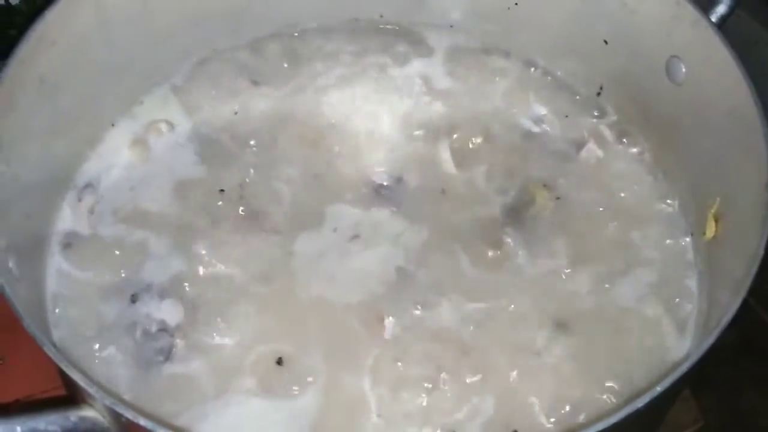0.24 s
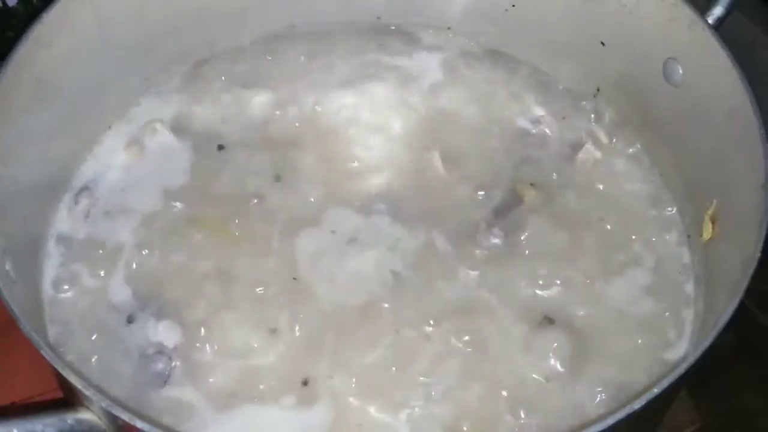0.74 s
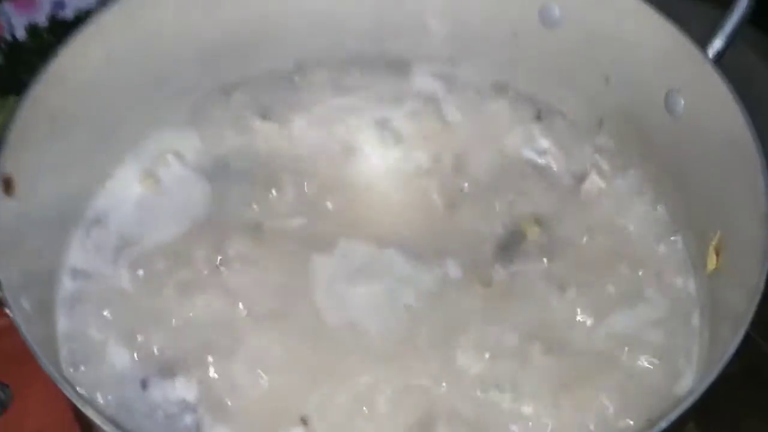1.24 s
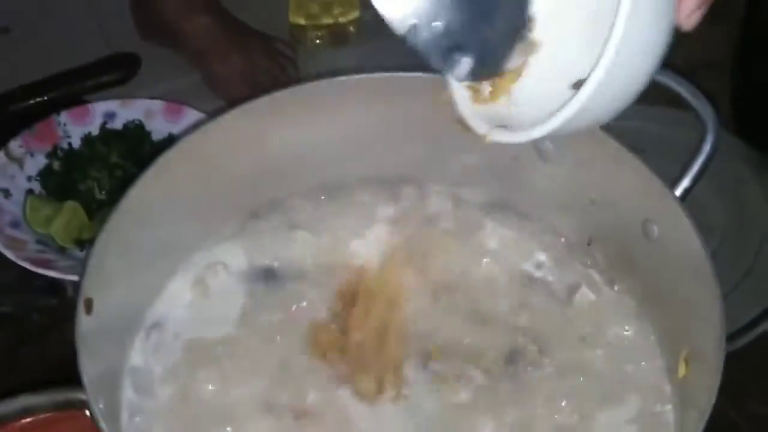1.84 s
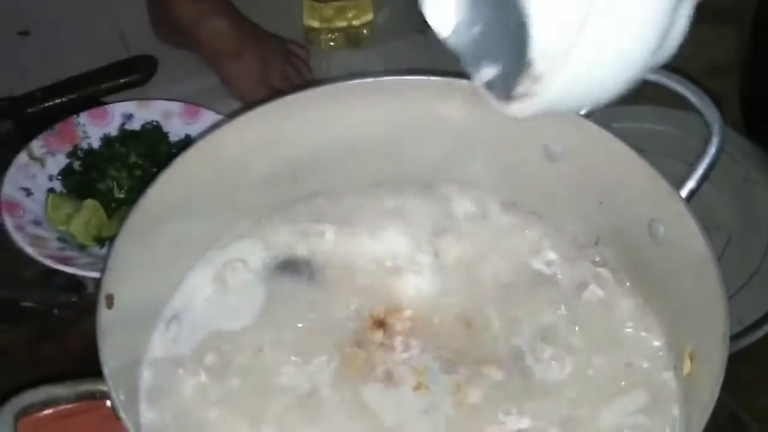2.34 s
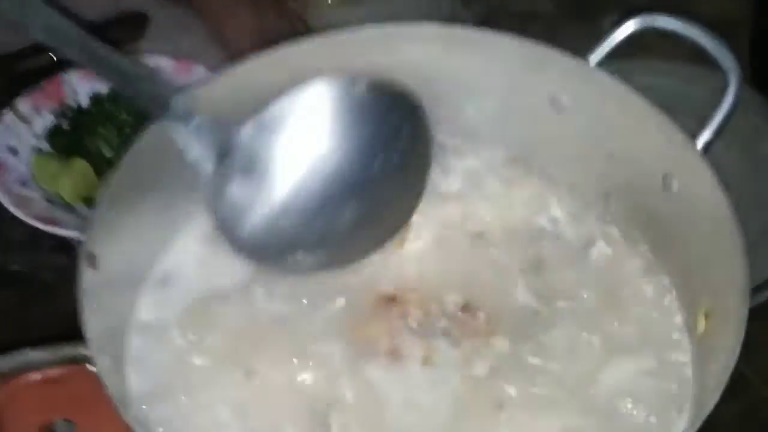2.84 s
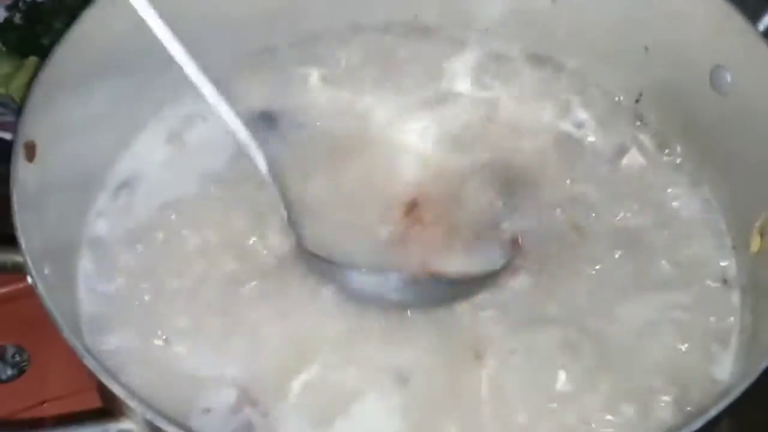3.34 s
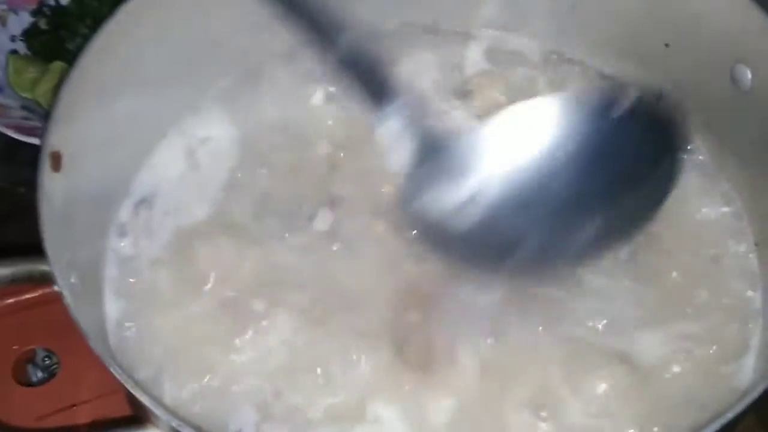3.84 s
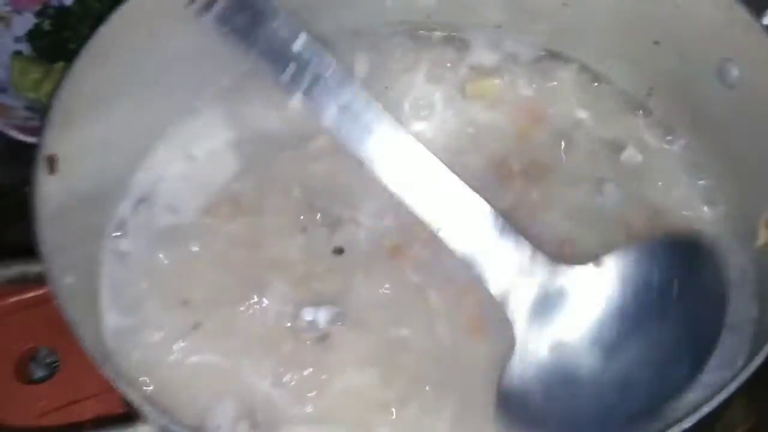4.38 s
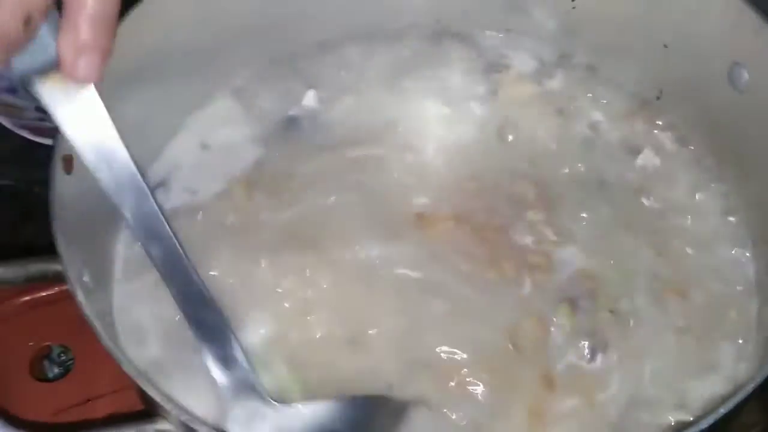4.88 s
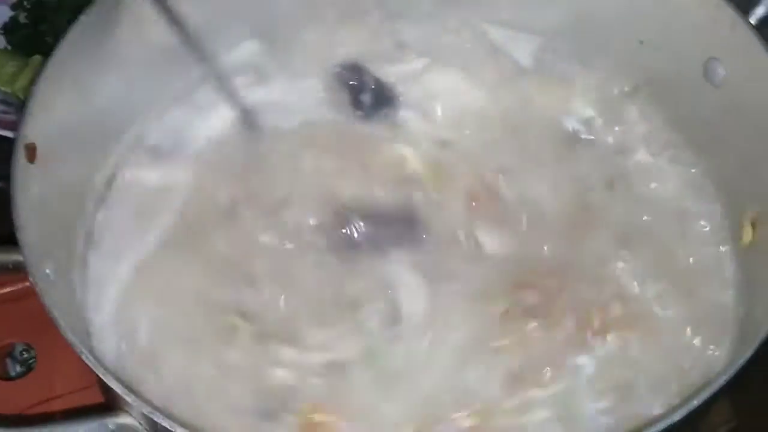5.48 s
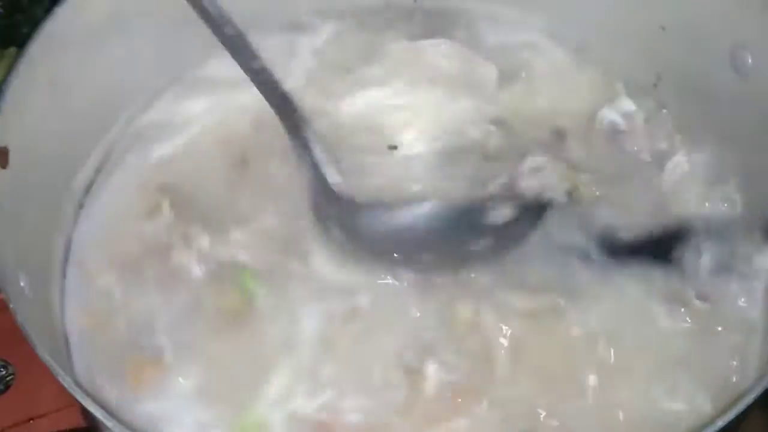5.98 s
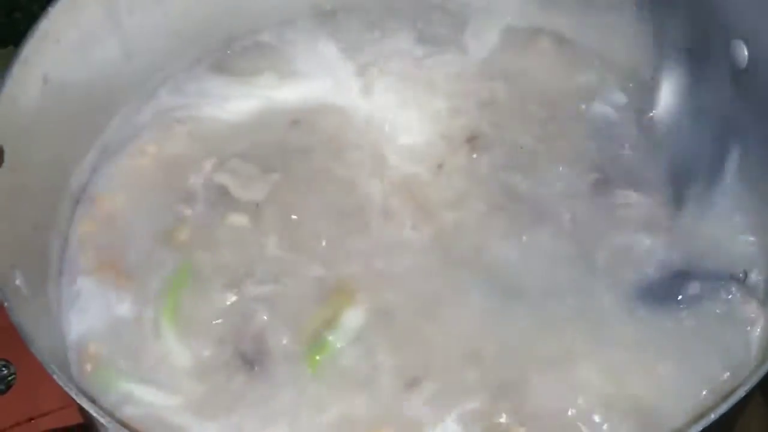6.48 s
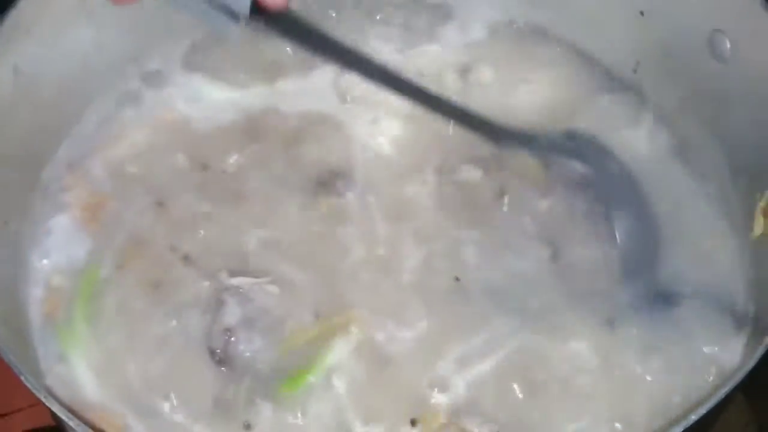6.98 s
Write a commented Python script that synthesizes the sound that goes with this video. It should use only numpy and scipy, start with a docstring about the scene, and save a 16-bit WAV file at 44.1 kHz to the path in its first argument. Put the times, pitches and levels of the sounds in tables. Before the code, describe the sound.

Thick porridge plops, spits and sizzles in a metal pot in a small kitchen. A spoon clinks on a china bowl, seasoning patters in, and several sharper taps knock out the rest. A ladle then stirs with wet crackles and dull knocks, striking the pot hard once near the end. The close hand-held microphone hears it mainly on the right, while the left is muffled with handling rumble.

```python
"""Thick porridge sizzles, plops and spits in a metal pot in a small kitchen, close to a hand-held camera.
From 1.4 s a spoon clinks on a china bowl, seasoning slides in, and the spoon knocks out the rest.
From 3.4 s a ladle stirs, crackling wetly, and knocks on the pot, which shifts; at 6.5 s it strikes hard.
Throughout, the right microphone hears the scene; the left is muffled and carries mostly grip rumble."""
import sys
import numpy as np
from scipy import signal
from scipy.fft import rfft, irfft, next_fast_len
from scipy.io import wavfile
from scipy.ndimage import uniform_filter1d

SR = 44100
rng = np.random.default_rng(int(sys.argv[2]) if len(sys.argv) > 2 else 0)


def generate_wav(signal):
    """Clip the signal to [-1, 1] and save it as 16-bit WAV at the path in sys.argv[1]."""
    frames = np.transpose(np.atleast_2d(signal))
    scaled = np.clip(frames, -1, 1) * 32767
    pcm = np.round(scaled).astype(np.int16)
    wavfile.write(sys.argv[1], SR, pcm)


N = 318402


def amp(db):
    return 10 ** (np.asarray(db) / 20)


def unit_rms(x):
    return x / np.sqrt(np.mean(x ** 2) + 1e-20)


def at_hz(points, hz):
    """Interpolates (f, value) rows over log frequency."""
    f, value = np.transpose(points)
    return np.interp(np.log(hz + 1), np.log(f), value)


def add(mix, start_s, sound):
    part = mix[max(round(start_s * SR), 0):][:len(sound)]
    part += sound[:len(part)]


def clock(length_s):
    return np.arange(int(length_s * SR)) / SR


def fade(t, t60_s):
    return amp(-60 * t / max(t60_s, .003))


def swells(rows, attack_s, t60_s):
    """Gain that rises, holds and decays for each (start, end, level) row."""
    t = np.arange(N) / SR
    return sum(amp(db) * np.clip((t - start) / attack_s, 0, 1) ** 2 * fade(np.maximum(t - end, 0), t60_s)
               for start, end, db in rows)


def shaped(x, gain):
    """Filters x by gain(hz)."""
    size = next_fast_len(len(x))
    return irfft(rfft(x, size) * gain(np.fft.rfftfreq(size, 1 / SR) + 1), size)[:len(x)]


def curve(colour):
    return lambda hz: amp(at_hz(colour, hz))


def band(centre_hz, width_oct):
    return lambda hz: np.exp(-(np.log2(hz / centre_hz) / (2 * max(width_oct, .05))) ** 2)


def high_pass(x, edge_hz):
    return signal.sosfilt(signal.butter(4, edge_hz, "high", fs=SR, output="sos"), x)


def noise(colour):
    return unit_rms(shaped(rng.standard_normal(N), curve(colour)))


def rippled(x, depth_db, spacing_hz=130):
    """Echoes between the pot's walls cut peaks and notches that differ from spot to spot."""
    grid_hz = np.arange(1, SR / 2, 50)
    kernel = np.exp(-((grid_hz[:41] - grid_hz[20]) / spacing_hz) ** 2)
    ripple = unit_rms(signal.fftconvolve(rng.standard_normal(len(grid_hz)), kernel, "same"))
    return shaped(x, lambda hz: amp(depth_db * np.interp(hz, grid_hz, np.minimum(ripple, 1))))


def puff(tint, t60_s, ripple_db, spacing_hz=130):
    """Decaying noise burst filtered by tint(hz); initial rms 1, 2 ms of lead."""
    decay = fade(clock(.25), t60_s)
    burst = np.pad(rng.standard_normal(len(decay)) * decay, (len(clock(.002)), 0))
    burst = rippled(shaped(burst, tint), ripple_db, spacing_hz)
    return burst * np.linalg.norm(decay) / np.linalg.norm(burst)


def bubble(hz, cycles, glide=.06, softness=.6):
    """The skin opens and the cavity sings a few cycles, rising by glide; 10 ms of lead."""
    cycles = max(cycles, 1)
    turns = (clock(.04) - .01) * hz
    steepness = np.where(turns < 0, 2 / softness, 2)
    envelope = 1 / np.cosh(np.clip(turns / cycles * steepness, -40, 40))
    bend = glide * np.log(np.cosh(turns / cycles)) * cycles
    return envelope * np.sin(2 * np.pi * (turns + bend))


def crackle(colour, per_s, spread_db, patchy_db):
    """Dense tiny pops whose colour shifts as they wander round the pot."""
    sizes = amp(spread_db * np.minimum(rng.exponential(1, N), 4)) * rng.choice([-1, 1], N)
    spectra = signal.stft(sizes * (rng.random(N) < per_s / SR), nperseg=512)[2]
    patches = uniform_filter1d(rng.standard_normal(spectra.shape), size=3, axis=0)
    patches = unit_rms(uniform_filter1d(patches, size=24, axis=1))
    pops = signal.istft(spectra * amp(patchy_db * np.minimum(patches, 1.5)), nperseg=512)[1][:N]
    return unit_rms(shaped(pops, curve(colour)))


# room air: f/Hz, level/dB
AIR_COLOUR = [(20, 10), (80, 11), (160, -15), (350, -9), (900, -22), (1500, -8), (2600, -35), (4200, -21.5),
              (6500, -32.5), (12000, -27.5), (14000, -16)]


def background(left_db=-80, right_db=-66, whine_db=-67, whine_hz=1683, width_hz=12):
    """Left: faint hiss. Right: quiet kitchen air and a thin steady whine."""
    whine = shaped(rng.standard_normal(N), lambda hz: 1 / (1 + ((hz - whine_hz) / width_hz) ** 2))
    left = amp(left_db) * noise([(100, 10), (600, -10), (3000, -11), (14000, -18)])
    right = amp(right_db) * noise(AIR_COLOUR) + amp(whine_db) * unit_rms(whine)
    return np.array([left, right])


# grip rumble: t/s, level/dB
GRIP_LEVEL = [(0, -43), (.46, -43), (.72, -52.5), (1.04, -66), (1.12, -30), (1.21, -43), (1.3, -38),
              (1.39, -23.5), (1.55, -37), (1.64, -28.5), (1.71, -31.5), (1.86, -26.5), (2.02, -45.5),
              (2.2, -49), (2.7, -42.5), (2.97, -28.5), (3.12, -43.5), (3.28, -34), (3.72, -57), (3.82, -49),
              (4.0, -48), (4.23, -54), (4.39, -35), (4.68, -59.5), (5.35, -60), (5.55, -52), (5.8, -67.5),
              (6.2, -71), (6.62, -45), (6.84, -52.5), (7.07, -46), (7.21, -63.5)]
# grip spectrum: f/Hz, level/dB
GRIP_COLOUR = [(20, -33.5), (38, -16.5), (52, 0.5), (78, 4.5), (110, -7), (160, -15.5), (250, -27.5),
               (500, -40.5), (900, -53.5), (4000, -78)]
# finger bumps: t/s, level/dB, f/Hz, t60/s, click level/dB
FINGER_BUMPS = [(0.038, -29, 61, 0.18, -60), (1.096, -27.5, 75.5, 0.14, -60), (1.248, -19, 59, 0.32, -27.5),
                (1.324, -10, 73, 0.16, -39), (1.552, -47, 90.5, .05, -32), (2.443, -18.5, 65.4, 0.15, -73),
                (3.268, -31, 65, 0.059, -34.5), (3.926, -29.5, 61, 0.39, -68), (4.385, -45, 71, .08, -29.5),
                (5.445, -33, 69.5, 0.048, -24.5), (5.453, -28.5, 61, 0.38, -19)]


def handling(gain_db=-1, click_t60_s=.0052, click_hz=900, low_cut_hz=36):
    """The grip rumbles through the camera case; fingers bump it now and then."""
    rumble = signal.hilbert(noise(GRIP_COLOUR))
    steady = rumble.real / np.sqrt(uniform_filter1d(abs(rumble) ** 2, size=1500) / 2 + .08)
    grip_db = np.interp(np.arange(N) / SR, *np.transpose(GRIP_LEVEL))
    out, t = amp(gain_db + grip_db) * steady, clock(.3)
    for s, db, hz, t60_s, click_db in FINGER_BUMPS:
        add(out, s, amp(db) * np.sin(2 * np.pi * hz * t) * fade(t, t60_s) * np.minimum(t / .00222, 1))
        click = puff(lambda f: 1 / (1 + (f / click_hz) ** 2), click_t60_s, ripple_db=1)
        add(out, s - .002, amp(click_db) * click)
    return shaped(out, lambda hz: 1 / (1 + (low_cut_hz / hz) ** 8))


# bursts of fine crackle: start/s, end/s, level/dB
CRACKLE_BURSTS = [(-.04, .03, -51.5), (.41, .67, -43), (1.01, 1.1, -39), (1.15, 1.66, -55),
                  (3.36, 3.48, -74), (4.27, 4.38, -59.5), (4.75, 5.02, -56), (5.82, 5.87, -72.5),
                  (6.6, 6.77, -55), (7.05, 7.15, -67.5)]
# fine crackle spectrum: f/Hz, level/dB
CRACKLE_COLOUR = [(900, -27), (2100, -15.5), (2800, 4.5), (4500, 8), (7200, 7.5), (9000, 0.5), (11500, 2),
                  (14000, -4)]


def fine_crackle(gain_db=-1, simmer_db=-80):
    """Bursts over a faint simmer: porridge sizzles at first, later crackles wetly under the ladle."""
    envelope = amp(simmer_db) + swells(CRACKLE_BURSTS, attack_s=.022, t60_s=.35)
    return amp(gain_db) * envelope * crackle(CRACKLE_COLOUR, per_s=2400, spread_db=3.5, patchy_db=8)


# porridge heaves: start/s, end/s, level/dB
CHURN_HEAVES = [(.5, .72, -53.5), (1.04, 1.11, -43.5), (1.47, 1.57, -48), (1.85, 2.1, -56), (2.8, 3.1, -66),
                (3.15, 3.3, -63.5), (3.38, 3.46, -71), (4.28, 4.45, -51.5), (4.76, 4.94, -48.5),
                (6.24, 6.7, -53), (7.02, 7.12, -47)]
# churning spectrum: f/Hz, level/dB
CHURN_COLOUR = [(200, -28), (380, 6.5), (520, 7.5), (750, -18.5), (1100, 13), (1500, -2.5), (2400, 6.5),
                (3500, -28), (6000, -27.5)]


def churn(bubbles_db=-4, squelch_db=-7, rest_db=-83.5, low_hz=360, high_hz=2250, spread_db=6.5):
    """Porridge bubbles and squelches softly, heaving with the boil or the push of the ladle."""
    swarm = np.zeros(N)
    for when, pitch, size in rng.random((1400, 3)):
        hz = low_hz * (high_hz / low_hz) ** pitch
        db = at_hz(CHURN_COLOUR, hz) - spread_db * np.log(.097 + size)
        add(swarm, when * N / SR, hz * amp(db) * bubble(hz, cycles=9, glide=0))
    squelch = crackle(CHURN_COLOUR, per_s=1800, spread_db=1.5, patchy_db=13)
    motion = amp(rest_db) + swells(CHURN_HEAVES, attack_s=.049, t60_s=.19)
    return motion * (amp(bubbles_db) * unit_rms(swarm) + amp(squelch_db) * squelch)


# gritty rasps: start/s, end/s, level/dB, f/Hz, width/oct
GRITTY_RASPS = [(0, 0.05, -56, 1980, 0.65), (3.681, 3.726, -61, 1670, 0.2),
                (4.27, 4.472, -51.5, 2560, 0.54), (4.7, 4.777, -57, 3660, 0.24),
                (6.283, 6.467, -52, 890, 0.056), (7.033, 7.198, -76, 1810, 0.48)]


def rasps(slips_per_s=700):
    """Short gritty rasps in the porridge; the later ones are rice grains slipping as the ladle moves."""
    out, t = np.zeros(N), clock(.19)
    for start, end, db, hz, width_oct in GRITTY_RASPS:
        slips = rng.standard_normal(len(t)) * (rng.random(len(t)) < slips_per_s / SR)
        rasp = unit_rms(rippled(shaped(slips, band(hz, width_oct)), depth_db=5))
        progress = np.clip(t / (end - start), 0, 1)
        add(out, start, amp(db) * np.sqrt(abs(np.sin(np.pi * progress))) * rasp)
    return out


def ticks(base_db=-58, spread_db=5, low_hz=2600, high_hz=10000, width_oct=.093, count=260):
    """Pinhead bubbles burst with dry ticks throughout."""
    out, t = np.zeros(N), clock(.02)
    for when, pitch, size in rng.random((count, 3)):
        snap = np.roll(rng.standard_normal(len(t)) * fade(t, t60_s=.012), len(t) // 4)
        hz = low_hz * (high_hz / low_hz) ** pitch
        db = base_db - spread_db * np.log(.04 + size)
        add(out, when * N / SR, amp(db) * shaped(snap, band(hz, width_oct)))
    return out


def blips(top_db=-50, spread_db=10, low_hz=520, high_hz=1400, count=34):
    """Smaller bubbles burst, one at a random moment in each time slot."""
    out = np.zeros(N)
    for slot, (when, pitch, size) in enumerate(rng.random((count, 3))):
        hz = low_hz * (high_hz / low_hz) ** pitch
        add(out, (slot + when) / count * N / SR, amp(top_db - spread_db * size) * bubble(hz, cycles=1))
    return out


def chirr(level_db=-65, centre_hz=13560, width_hz=110, first_s=.115, period_s=.36):
    """A faint, very high repeating chirp, perhaps a cricket."""
    attack_s, hold_s = .015, .06
    t = (np.arange(N) / SR - first_s) % period_s
    envelope = np.minimum(t / attack_s, 1) * fade(np.maximum(t - hold_s, 0), t60_s=.3)
    trill = shaped(rng.standard_normal(N), lambda hz: np.exp(-((hz - centre_hz) / width_hz) ** 2))
    return amp(level_db) * envelope * unit_rms(trill)


# large bubbles: t/s, level/dB, f/Hz, base length/cycles
LARGE_BUBBLES = [(0.315, -34, 1100, 2.1), (0.4003, -35.5, 594, 1.7), (0.6857, -32.5, 765, 0.9),
                 (0.8589, -40, 454, 0.5), (0.8713, -38, 1030, 0.92), (1.0305, -45.5, 1110, 5.8),
                 (1.0854, -28, 1620, 1), (1.1454, -18, 950, 0.8), (1.179, -31, 516, 1.9),
                 (1.2242, -27.5, 1220, 0.9), (1.2472, -32, 1070, 0.7), (1.4623, -27, 1210, 0.7),
                 (1.5257, -30.5, 970, 0.6), (1.8935, -33, 498, 1.9), (1.9342, -33, 507, 1.9),
                 (2.0214, -19, 600, 0.6), (2.0816, -25, 946, 1.1), (2.7707, -24, 1340, 1.7),
                 (2.7919, -31.5, 520, 1.4), (2.9212, -34, 1364, 3.4), (2.9505, -26, 1585, 0.82),
                 (2.991, -18, 970, 0.82), (3.1905, -38.5, 1120, 4.8), (3.211, -31.5, 496, 1.4),
                 (3.2219, -22, 796, 0.64), (3.427, -25.5, 1110, 0.88), (3.5732, -47.5, 631, 5),
                 (3.8074, -39.5, 1024, 2.7), (3.871, -35, 645, 1.24), (4.1385, -21, 904, 1.23),
                 (4.3503, -37.5, 960, 2.9), (4.4326, -26, 740, 0.5), (4.4376, -27, 1120, 3.8),
                 (4.516, -19, 720, 0.6), (4.6822, -41, 1080, 3.9), (4.9807, -30.5, 745, 0.65),
                 (5.2043, -39, 466, 2.4), (5.5872, -28.5, 516, 1.6), (5.853, -38, 1132, 3.8),
                 (6.0466, -33, 980, 0.86), (6.699, -26.5, 652, 0.85), (7.0564, -31, 590, 0.5),
                 (7.0742, -23.5, 940, 2.04)]


def plops(low_cut_hz=320, tear_db=-27, after_db=-20, after_s=.025):
    """A large bubble tears its wet skin; smaller ones follow as the crater closes."""
    out = np.zeros(N)
    for s, db, hz, cycles in LARGE_BUBBLES:
        add(out, s - .01, amp(db) * bubble(hz, cycles + .2, softness=.8))
        tear = puff(band(hz * .81, width_oct=.4), t60_s=.038, ripple_db=4)
        add(out, s - .004, amp(db + tear_db) * tear)
        for delay, pitch in rng.random((4, 2)):
            follower = bubble(hz * (.45 + .9 * pitch), cycles=1.5)
            add(out, s + after_s * delay - .005, amp(db + after_db) * follower)
    return shaped(out, lambda hz: 1 / (1 + (low_cut_hz / hz) ** 6))


# wet snaps: t/s, level/dB, f/Hz, width/oct
FILM_SNAPS = [(0.3461, -45, 5330, .35), (0.4183, -22.5, 5560, 0.46), (0.7504, -37, 10000, 0.54),
              (0.9102, -26, 6750, 0.81), (1.0429, -21.5, 7640, 0.34), (1.085, -24, 8100, 0.51),
              (1.827, -31, 6600, 0.6), (1.847, -37, 4850, 0.43), (1.9455, -22, 5650, 0.37),
              (2.5988, -42, 6540, 0.5), (2.802, -38, 5850, 0.28), (3.18, -46, 5700, 0.19),
              (3.215, -48, 7040, 0.67), (3.311, -53, 3820, 0.85), (3.389, -45, 6370, 0.11),
              (3.548, -40, 4190, .1), (3.591, -48.5, 2600, 0.13), (3.762, -48, 6500, .5),
              (3.807, -44, 5320, 0.31), (3.95, -45.5, 5500, 0.33), (4.0869, -38, 5000, .5),
              (4.1953, -37.5, 4600, 0.25), (4.511, -35.5, 4540, 0.24), (4.709, -40, 6280, 0.49),
              (4.8167, -32.5, 3750, 0.79), (4.8383, -32, 3830, 0.7), (5.024, -38.5, 5880, 0.25),
              (5.273, -31, 4180, 0.39), (5.069, -54, 6200, 0.18), (5.5505, -43, 6260, 0.57),
              (5.694, -40.5, 3400, .18), (6.0576, -38, 4720, .42), (6.23, -40.5, 3650, 0.12),
              (6.761, -37, 4520, 0.78), (6.814, -43, 7350, 0.74), (7.072, -38.5, 7540, 0.2)]


def spits(puff_db=-1, tick_db=6, after_db=-45, after_s=.13, scatter_oct=.6):
    """Thin films snap with a tick and a short puff; each sets off three tiny singing bubbles."""
    out, impulse = np.zeros(N), signal.unit_impulse(len(clock(.02)), "mid")
    for s, db, hz, width_oct in FILM_SNAPS:
        tint = band(hz, width_oct)
        add(out, s - .002, amp(db + puff_db) * puff(tint, t60_s=.029, ripple_db=7))
        add(out, s - .01, amp(db + tick_db) * shaped(impulse, tint) / np.sqrt(width_oct))
        for delay, pitch, size in rng.random((3, 3)):
            ping = bubble(hz * 2 ** (scatter_oct * (2 * pitch - 1)), cycles=9)
            add(out, s + after_s * delay, amp(after_db) * size * ping)
    return high_pass(out, edge_hz=1000)


# spoon on bowl: t/s, crack level/dB, knock f/Hz, knock level/dB
SPOON_BLOWS = [(1.358, -32, 1213, -10), (1.4233, -16, 1556, -12.5), (1.4531, -28, 1610, -21.5),
               (2.014, -11, 1660, -30), (2.0326, -24, 1050, -24), (2.1419, -16.5, 1114, -15),
               (2.2037, -19, 1140, -21), (2.2733, -2.5, 1590, -3), (2.2864, -11.5, 1660, -20.5),
               (2.296, -13.5, 1660, -28.5)]
# bowl and spoon modes: f/Hz, level/dB, t60/s
BOWL_MODES = [(1447, -6, .18), (1515, 1, .3), (1575, 1, .2), (1625, -3, .18), (1765, -10, .2),
              (3915, -2, .26), (4227, -9, .22), (4600, -8, .28), (5373, -10, .2), (6984, -7, .2),
              (7146, -3, .24), (7248, -2, .28), (7415, -6, .18), (10790, -5, .16)]
# crack spectrum: f/Hz, level/dB
CHINA_COLOUR = [(200, -22), (500, -6), (1100, -12.5), (1600, 11.5), (2500, -2), (4200, 10), (6000, 2.5),
                (7200, 12), (8800, -3.5), (11000, 0.5), (14000, -4)]


def clinks(crack_db=-1, knock_db=-5, hollow_db=-13, ring_db=-19, ring_db_per_db=4.23):
    """Each spoon blow is a crack, a hollow knock and a brief ring of the hand-held china."""
    out, t = np.zeros(N), clock(.4)
    for s, db, hz, body_db in SPOON_BLOWS:
        crack = puff(curve(CHINA_COLOUR), t60_s=.028, ripple_db=3)
        hollow = puff(band(hz * .88, width_oct=.35), t60_s=.049, ripple_db=2)
        add(out, s - .002, amp(db + crack_db) * crack + amp(body_db + hollow_db) * hollow)
        knock = np.sin(2 * np.pi * hz * t) * fade(t, t60_s=.024)
        ring = sum(amp(mode_db) * fade(t, t60_s) * np.sin(2 * np.pi * (f * t + rng.random()))
                   for f, mode_db, t60_s in BOWL_MODES)
        # only a firm blow makes the bowl ring
        add(out, s, amp(body_db + knock_db) * knock + amp(db * ring_db_per_db + ring_db) * ring)
    return high_pass(out, edge_hz=350)


# clumps leaving the bowl: start/s, end/s, level/dB
SEASONING_CLUMPS = [(1.705, 1.77, -41.5), (1.81, 1.89, -38)]
# patter spectrum: f/Hz, level/dB
SEASONING_COLOUR = [(600, -23.5), (1500, -11.5), (2500, -2), (4500, 3.5), (7200, 4), (9500, 0),
                    (14000, -3.5)]


def seasoning():
    """Crisp crumbs patter on the porridge."""
    flow = swells(SEASONING_CLUMPS, attack_s=.046, t60_s=.3)
    return flow * crackle(SEASONING_COLOUR, per_s=900, spread_db=4, patchy_db=4)


# ladle on pot, under the porridge: t/s, level/dB, t60/s
LADLE_KNOCKS = [(3.393, -36.5, 0.021), (3.425, -45, 0.072), (4.5099, -30, 0.048), (5.2707, -36.5, 0.16),
                (5.6921, -36, 0.097), (5.767, -53.5, 0.029), (5.832, -52.5, 0.046), (6.044, -43.5, 0.035),
                (6.23, -36.5, 0.068), (6.305, -43.5, 0.085), (6.352, -45.5, 0.043), (7.011, -37.5, 0.058)]
# pot and ladle modes: f/Hz, half-width/Hz, level/dB
POT_MODES = [(940, 16, -4), (1120, 87, 0), (1604, 70, 7), (1916, 210, -1), (2220, 98, -19),
             (2476, 165, -12), (2760, 86, -22), (2910, 84, -16), (4240, 85, -8)]
# dull part of a knock: f/Hz, level/dB
DULL_COLOUR = [(300, -20.5), (650, -7), (1000, 11.5), (1700, -6), (2400, 6.5), (3200, -16), (4300, -28.5),
               (6000, -21), (9000, -42), (14000, -28)]


def knocks(gain_db=1, dull_db=-9):
    """The sunken ladle excites the quickly damped resonances of the full pot."""
    def tint(hz):
        power = sum(amp(2 * db) / (1 + ((hz - f) / width_hz) ** 2) ** 2 for f, width_hz, db in POT_MODES)
        return np.sqrt(power) + amp(dull_db + at_hz(DULL_COLOUR, hz))
    out = np.zeros(N)
    for s, db, t60_s in LADLE_KNOCKS:
        add(out, s - .002, amp(db + gain_db) * puff(tint, t60_s, ripple_db=3.5))
    return out


# pot shifts: t/s, level/dB, t60/s, upper edge/Hz
POT_SHIFTS = [(4.511, -46, 0.27, 417), (4.811, -36, 0.49, 265), (5.204, -52, 0.49, 171.7),
              (6.468, -41, 0.37, 381), (6.731, -33.5, 0.39, 283)]


def thuds(low_cut_hz=75, attack_s=.00034):
    """The pot shifts on the stove and both shudder dully."""
    out, t = np.zeros(N), clock(.47)
    for s, db, t60_s, edge_hz in POT_SHIFTS:
        body = shaped(rng.standard_normal(len(t)),
                      lambda hz: 1 / (1 + (low_cut_hz / hz) ** 4) / np.sqrt(1 + (hz / edge_hz) ** 5))
        add(out, s, amp(db) * unit_rms(body) * fade(t, t60_s) * np.minimum(t / attack_s, 1))
    return out


# ladle on bare wall: t/s, level/dB, t60/s
WALL_STRIKES = [(6.469, -4.5, 0.018), (6.537, -30, 0.057)]
# strike spectrum: f/Hz, level/dB
METAL_COLOUR = [(60, -52), (200, -14), (800, 2), (1700, 3), (2300, 4.5), (3400, 8), (4800, 3.5),
                (6200, 7.5), (9000, 0.5), (14000, -4.5)]


def clacks():
    """Metal on metal: a hard, bright crack."""
    out = np.zeros(N)
    for s, db, t60_s in WALL_STRIKES:
        add(out, s - .002, amp(db) * puff(curve(METAL_COLOUR), t60_s, ripple_db=1.5, spacing_hz=70))
    return out


# room decay: f/Hz, t60/s
KITCHEN_DECAY = [(100, 0.37), (500, 0.44), (1500, 0.46), (4000, 0.38), (8000, 0.33), (14000, 0.32)]


def kitchen(x, early_db=4, early_t60_s=.095):
    """Quick echoes inside the pot, then the tail of a small hard room."""
    t = clock(.7)
    onset = np.clip((t - .002) / .0045, 0, 1)
    taps = rng.standard_normal(len(t)) * (rng.random(len(t)) < .15) * onset
    taps *= 1 + amp(early_db) * fade(t, early_t60_s)
    hz, frame_s, spectra = signal.stft(taps, SR, nperseg=256)
    decay = amp(-60 * frame_s / at_hz(KITCHEN_DECAY, hz)[:, None])
    tail = signal.istft(spectra * decay, SR, nperseg=256)[1]
    return signal.fftconvolve(x, tail / np.linalg.norm(tail))[:N]


# muffled left microphone: f/Hz, gain/dB
LEFT_RESPONSE = [(60, -16), (200, -24), (500, -29), (1000, -44), (1600, -26.5), (3000, -36), (4700, -25),
                 (6500, -37), (10000, -37.5), (14000, -48.5)]


def scene(right_grip_db=-43.5):
    """Porridge, bowl and ladle sit apart and echo differently; returns (left, right)."""
    # source, room send/dB
    porridge = [(plops() + blips(), -8), (spits(), -5.5),
                (fine_crackle() + seasoning() + ticks(), -11.5), (churn() + rasps(), -8.5)]
    bowl = [(clinks(), -6)]
    ladle = [(knocks(), -3), (clacks(), -4.5)]
    airborne = thuds() + chirr()
    for place in (porridge, bowl, ladle):
        airborne += sum(x for x, _ in place)
        airborne += kitchen(sum(x * amp(send_db) for x, send_db in place))
    grip = handling()
    left = shaped(airborne, curve(LEFT_RESPONSE)) + grip
    right = airborne + amp(right_grip_db) * grip
    return np.array([left, right]) + background()


def record(dry, ceiling=.9, edge_hz=14350):
    """Soft overload on the hardest blows, then the band limit."""
    low_pass = signal.firwin(401, edge_hz, window=("kaiser", 8), fs=SR)
    return signal.oaconvolve(ceiling * np.tanh(dry / ceiling), low_pass[None], "same")


dry = scene()
out = record(dry)
generate_wav(out)
```